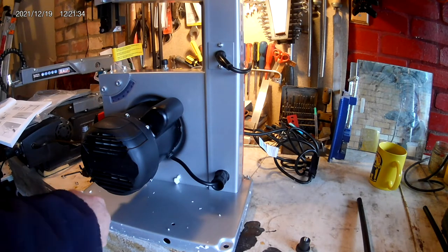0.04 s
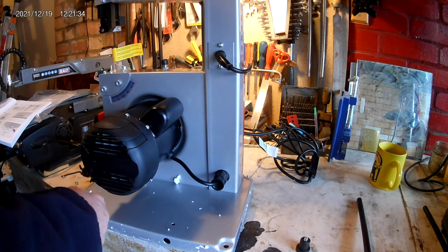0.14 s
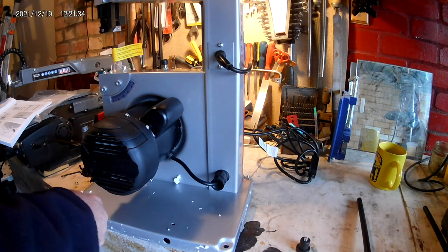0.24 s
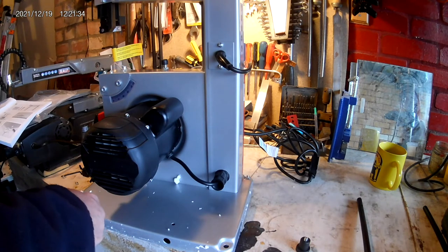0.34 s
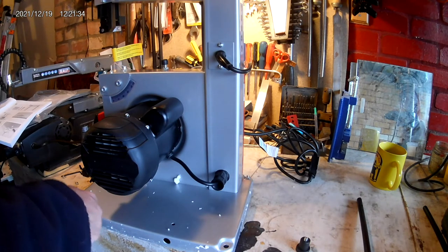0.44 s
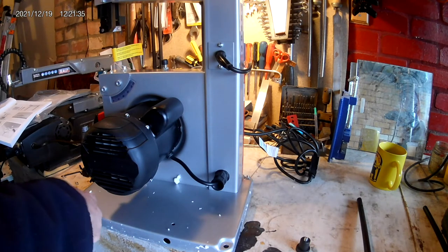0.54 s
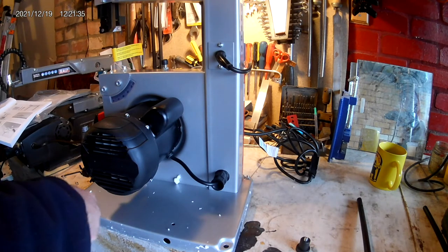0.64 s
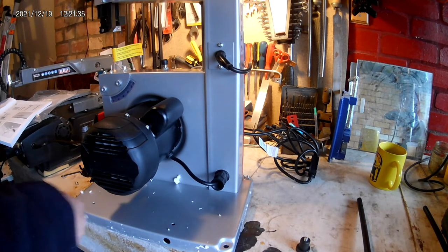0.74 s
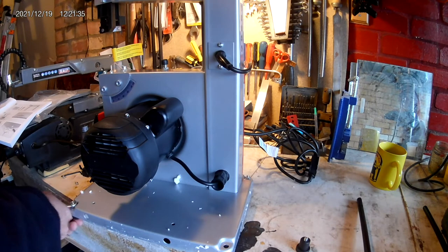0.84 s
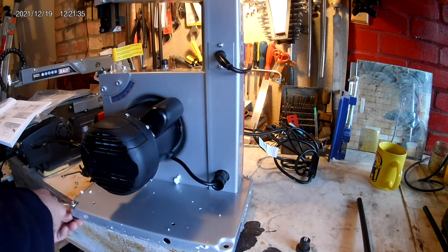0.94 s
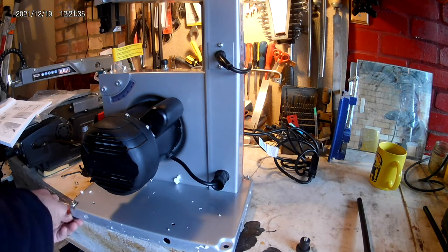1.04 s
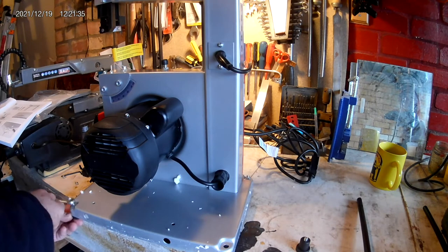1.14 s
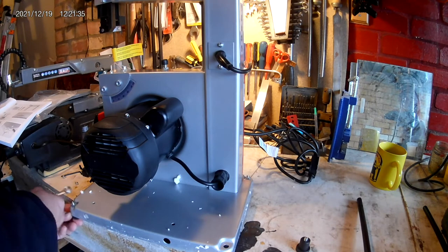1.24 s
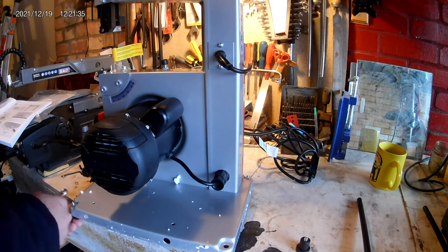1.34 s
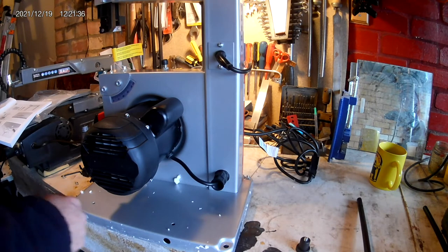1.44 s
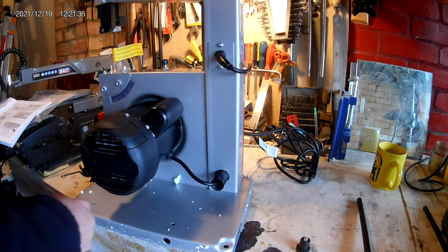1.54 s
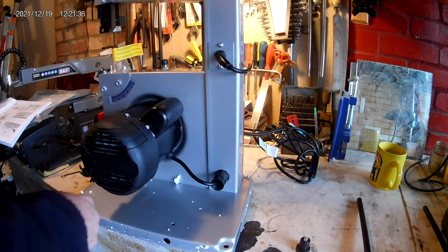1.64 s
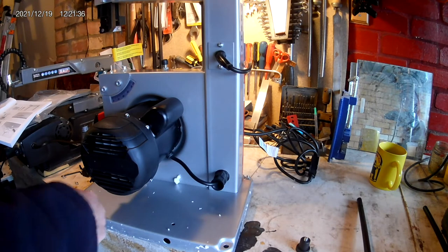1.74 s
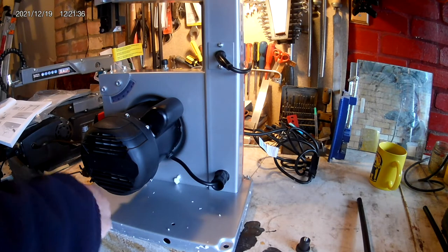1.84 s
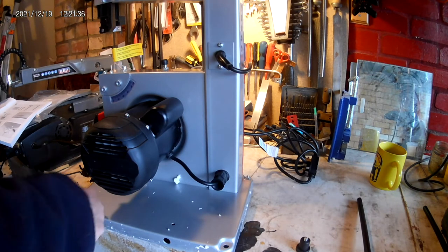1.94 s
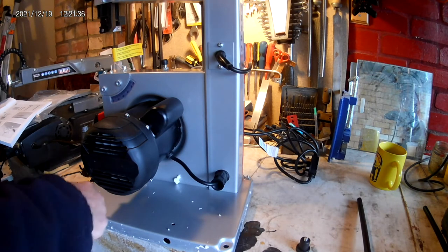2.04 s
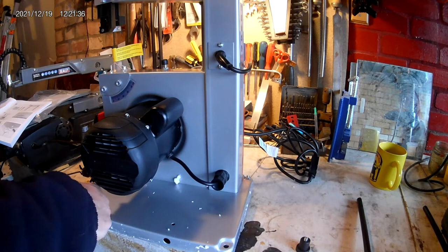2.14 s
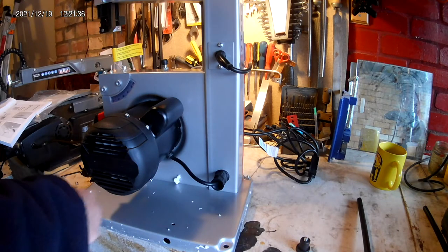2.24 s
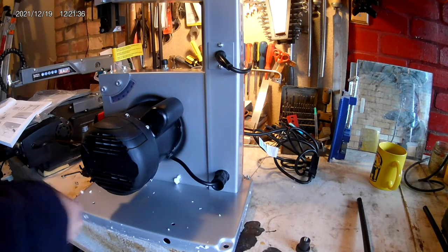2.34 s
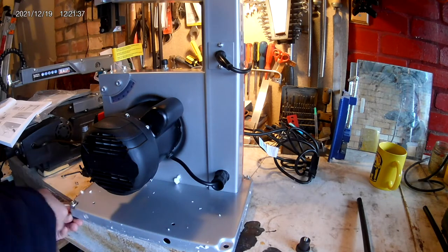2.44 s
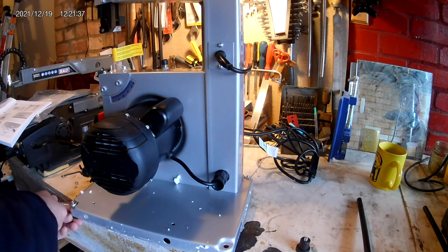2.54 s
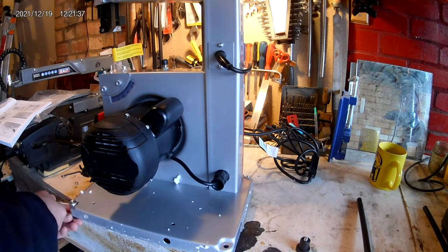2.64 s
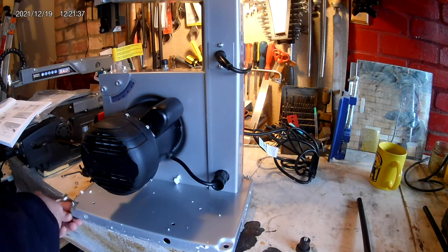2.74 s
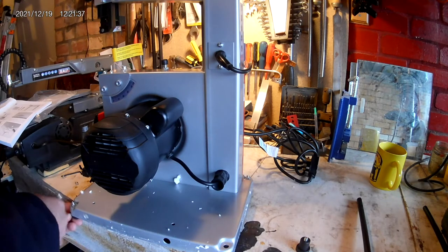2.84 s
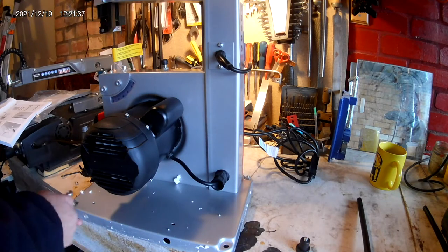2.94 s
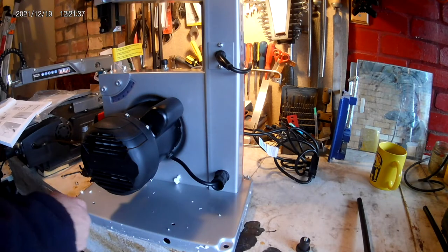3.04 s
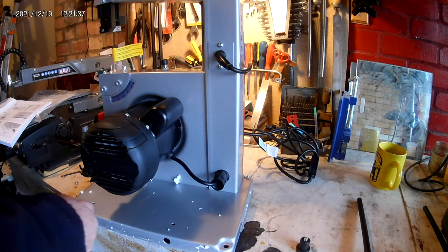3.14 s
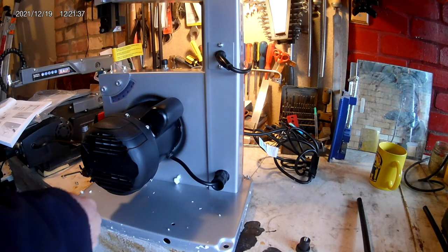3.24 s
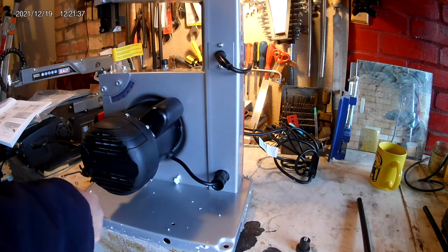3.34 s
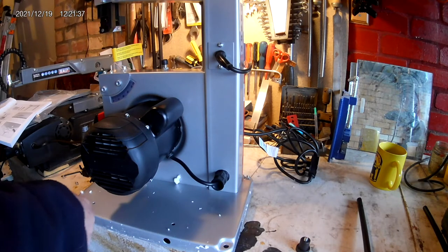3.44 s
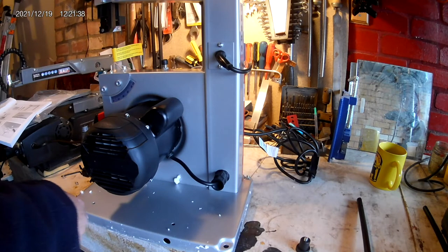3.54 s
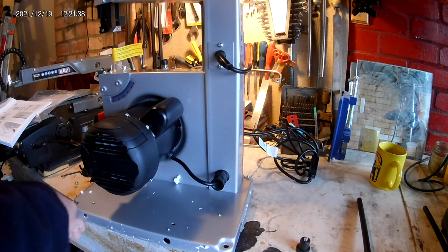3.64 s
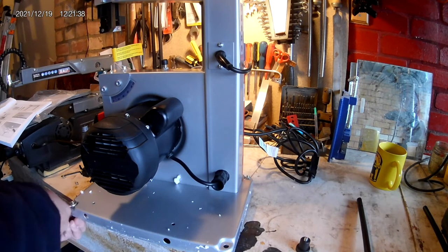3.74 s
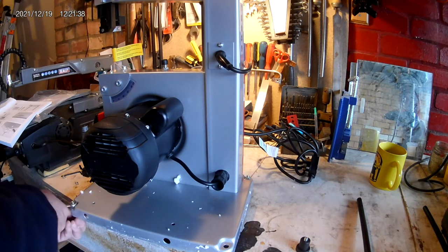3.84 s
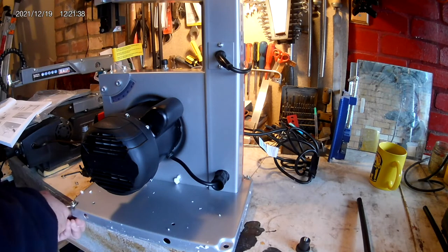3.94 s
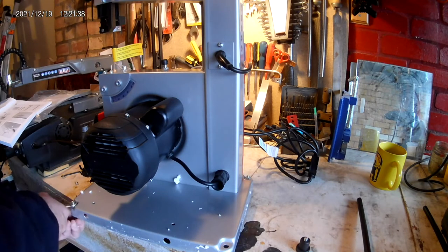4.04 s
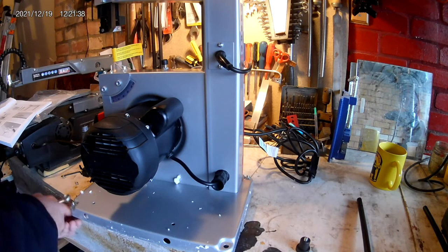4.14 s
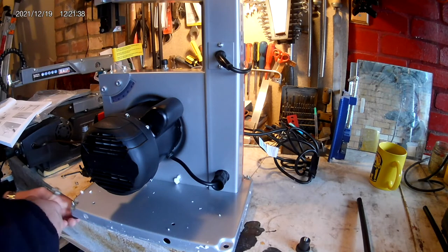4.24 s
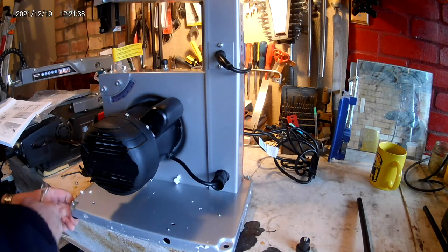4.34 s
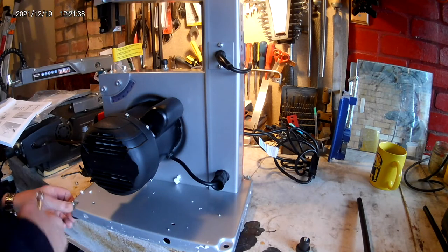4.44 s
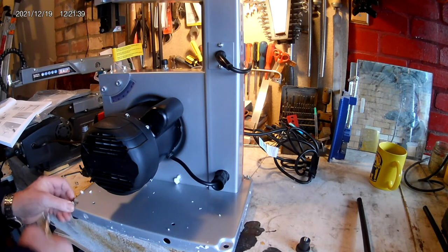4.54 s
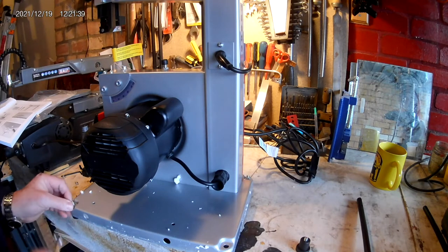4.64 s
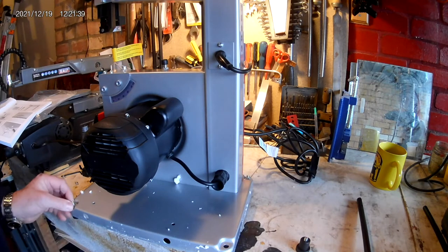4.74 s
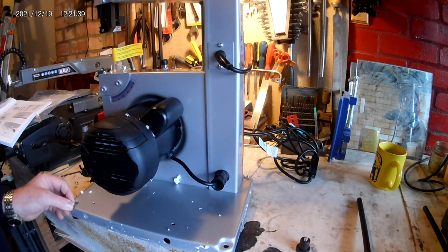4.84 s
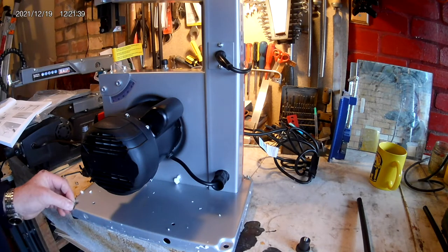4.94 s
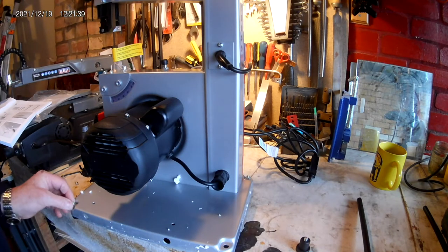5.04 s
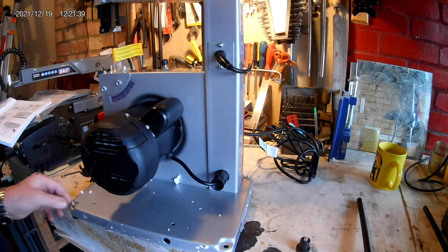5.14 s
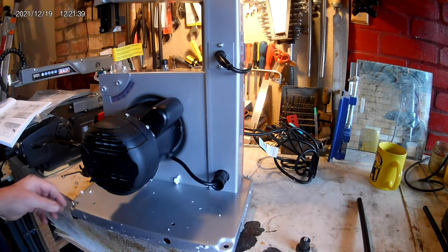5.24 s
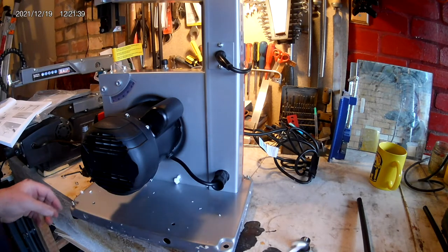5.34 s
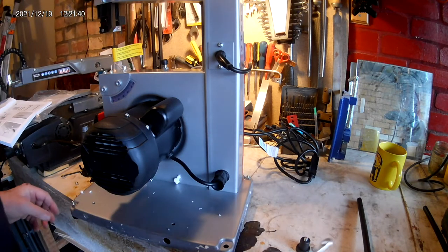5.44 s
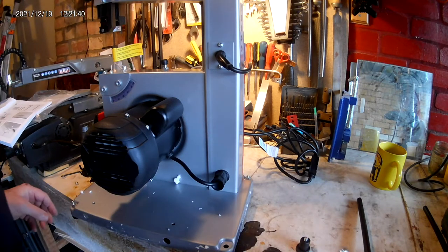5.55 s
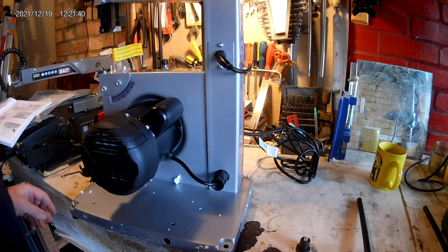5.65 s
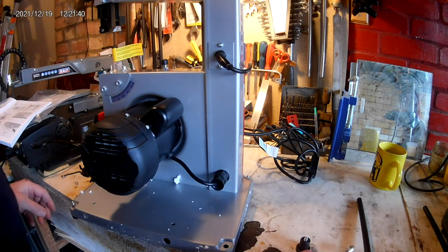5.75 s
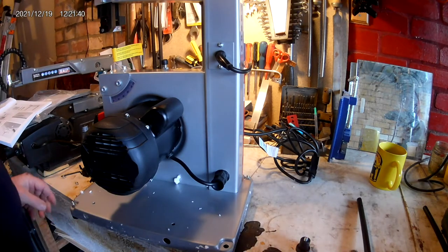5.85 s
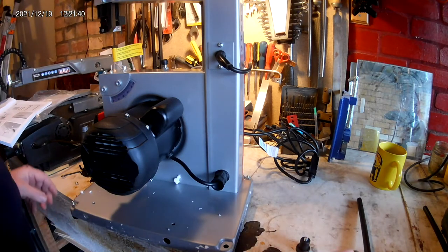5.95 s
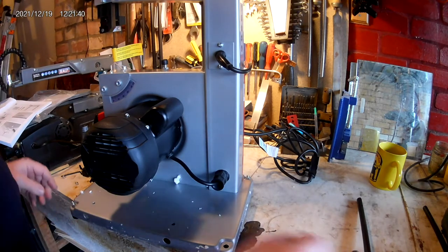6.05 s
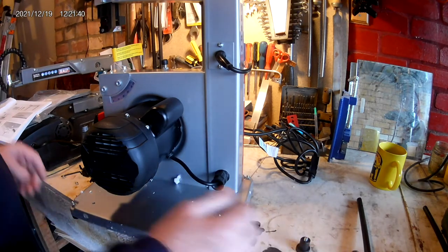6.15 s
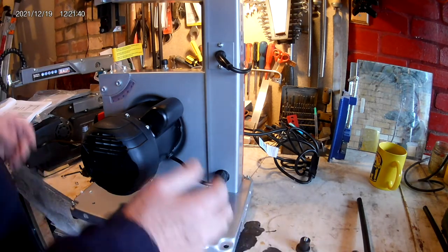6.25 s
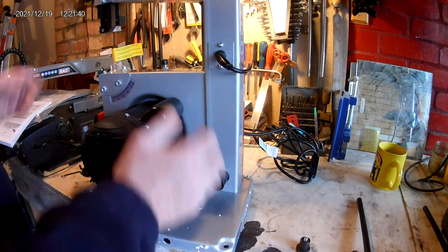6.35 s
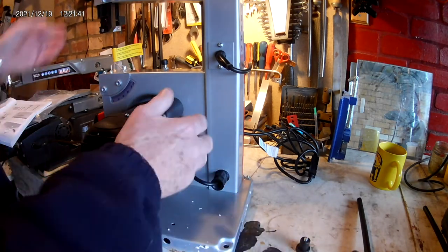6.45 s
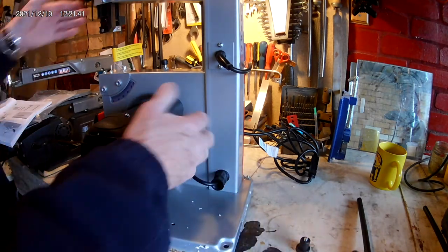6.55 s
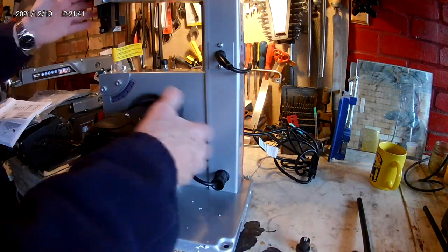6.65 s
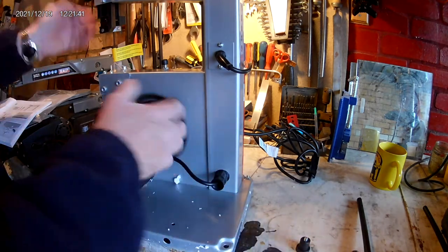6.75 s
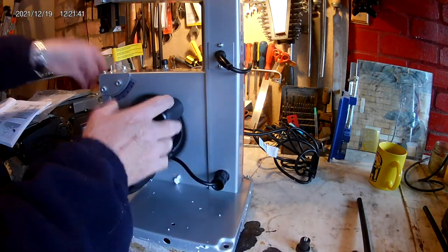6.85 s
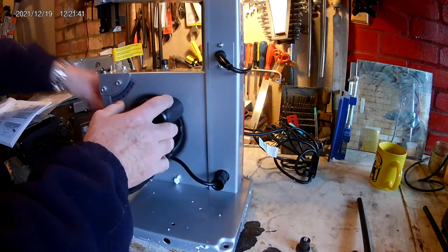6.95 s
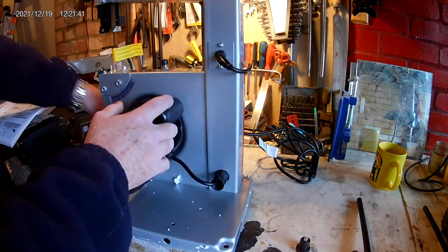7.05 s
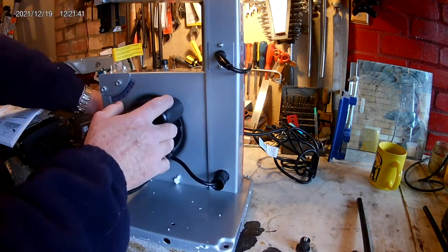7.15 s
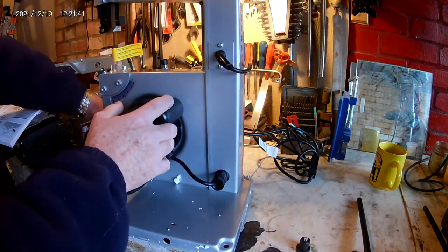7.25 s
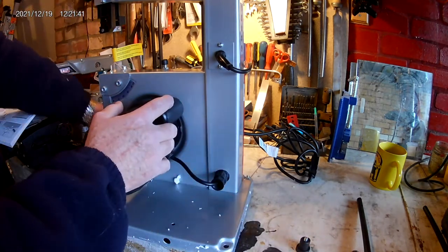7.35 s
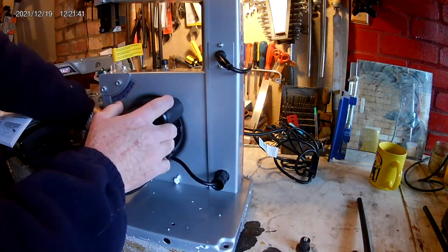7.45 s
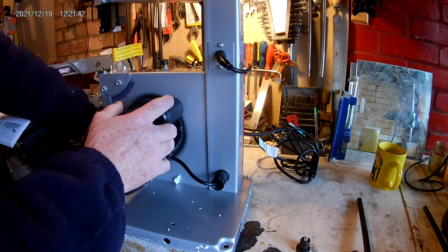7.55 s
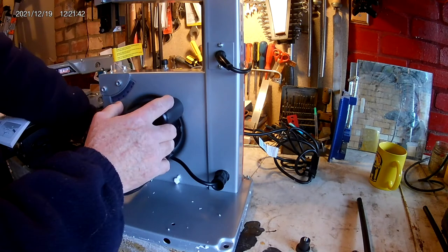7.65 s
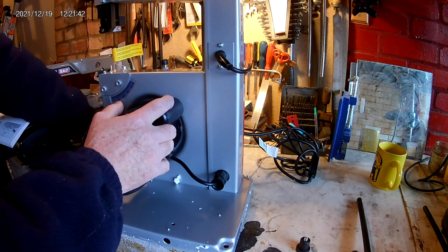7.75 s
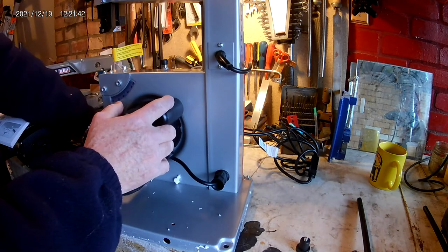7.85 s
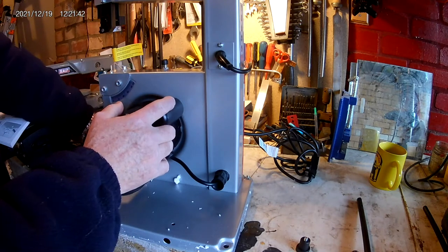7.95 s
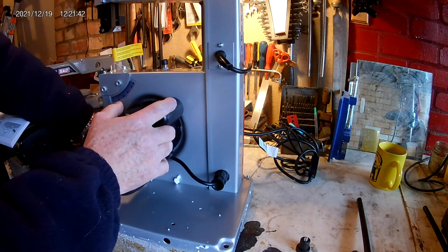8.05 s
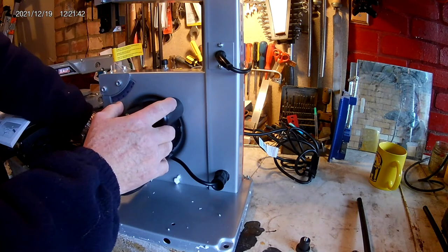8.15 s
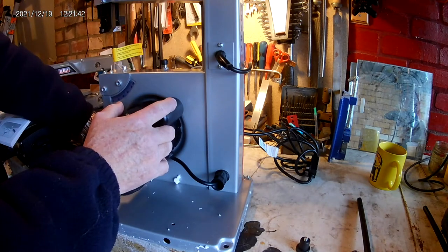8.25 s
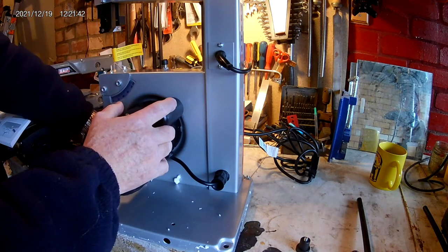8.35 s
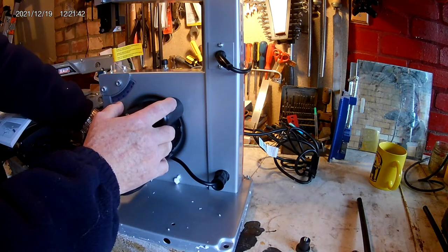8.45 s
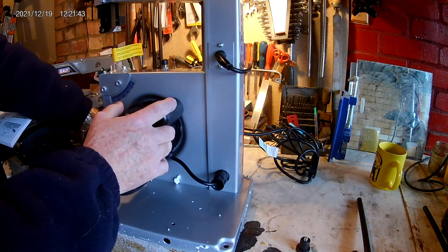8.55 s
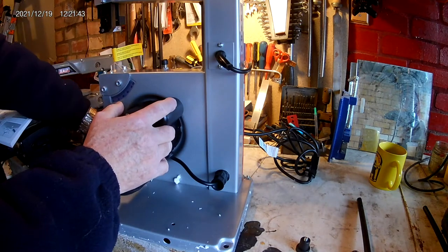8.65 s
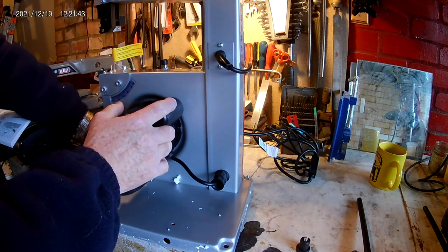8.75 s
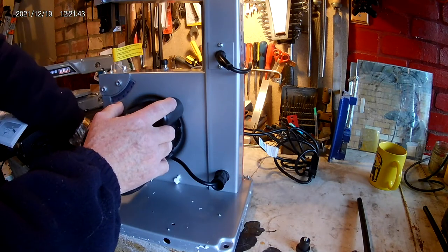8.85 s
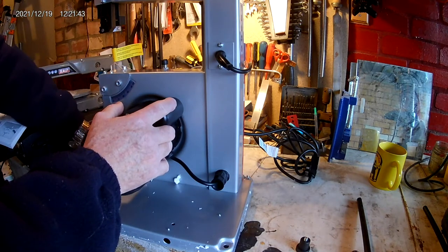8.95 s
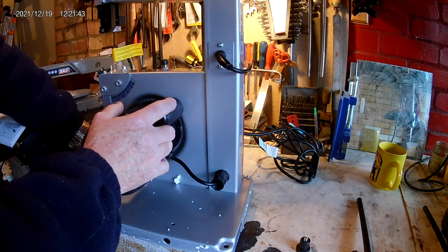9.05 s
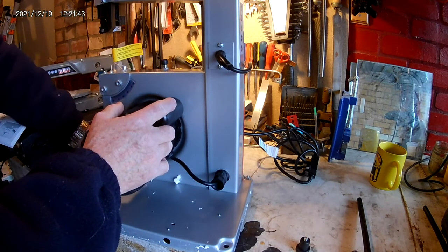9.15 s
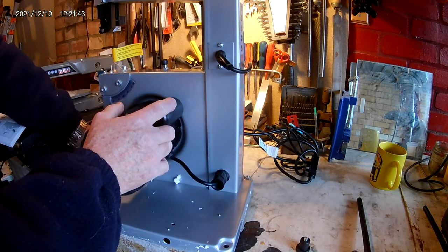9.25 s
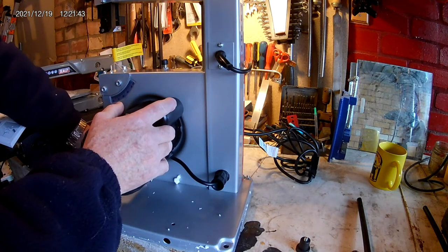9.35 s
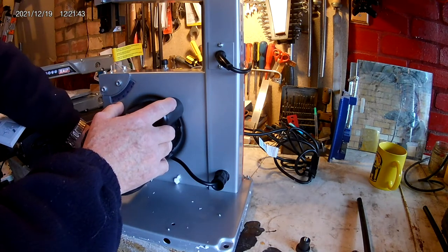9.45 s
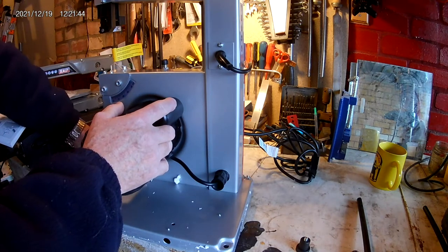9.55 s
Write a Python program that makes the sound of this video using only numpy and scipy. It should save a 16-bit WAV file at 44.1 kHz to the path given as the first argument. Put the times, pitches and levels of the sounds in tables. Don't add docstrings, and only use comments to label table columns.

```python
import sys
import numpy as np
from scipy import signal
from scipy.fft import rfft, irfft, next_fast_len
from scipy.io import wavfile
from scipy.ndimage import uniform_filter1d

SR = 44100
rng = np.random.default_rng(int(sys.argv[2]) if len(sys.argv) > 2 else 0)


def wav_out(sig):
    wavfile.write(sys.argv[1], SR, np.round(np.clip(np.atleast_2d(sig).T, -1, 1) * 32767).astype(np.int16))


def elevation(decibels):
    levels = np.asarray(decibels, float)
    return 10 ** (levels / 20)


N = 423801
RING = np.arange(int(.3 * SR)) / SR

# start_s, peak_db, hardness_db (treble), weight_db (bass), pitch_hz
BLOWS = [(0.204, -27, -21, -16, 820), (0.2505, -23.5, -25, -29.5, 720), (0.355, -43, -35, -14, 1480),
         (0.447, -26, -17.5, -19.5, 780), (1.056, -37, -22, -10.5, 1260), (1.082, -26.5, -21, -23, 867),
         (1.417, -23.5, -20, -19.5, 887), (1.429, -22, -15, -22, 867), (1.589, -42, -24.5, -24, 776),
         (1.753, -30, -23, -18, 667), (2.0648, -27, -20, -17, 1313), (2.435, -33, -52, -16.5, 876),
         (2.602, -41.5, -28, -16, 1130), (3, -27, -13.5, -19.5, 844), (3.0415, -28, -18, -11.5, 765),
         (3.087, -33, -27, -22, 820), (3.136, -33.5, -19, -13, 700), (3.316, -31.5, -28.5, -23, 790),
         (3.812, -45.5, -67, -4, 830), (3.9095, -38, -22, -3.5, 737), (4.031, -39, -26, -16, 1290)]
# start_s, peak_db, hardness_db, weight_db
RATTLES = [(0.209, -28.5, -22, -25.5), (0.299, -35.5, -29, -16), (2.07, -35.5, -23.5, -24.5),
           (2.464, -51.5, -45, 4), (2.597, -55.5, -27, -15), (2.617, -56.5, -25, -15),
           (3.047, -33, -11, -10), (3.166, -43, -28, -3), (3.319, -29.5, -30, -24),
           (3.827, -44.5, -47, -0.5), (4.022, -43.5, -26, -17), (1.747, -36, -23, -14.5),
           (1.454, -34, -21, -5), (0.225, -28.5, -22.5, -16), (0.262, -32.5, -28, -24),
           (0.441, -44, -23, -7), (1.099, -28.5, -21.5, -13), (1.121, -34.5, -24.5, -18),
           (1.444, -29, -22, -15), (1.734, -47, -29, -19), (1.741, -43, -30, -27), (1.764, -32, -27.5, -21),
           (3.014, -30.5, -19, -16), (3.062, -35, -31, -17), (3.15, -32.5, -28.5, -8),
           (3.3, -44.5, -34, -8), (3.311, -33, -72, -24.5), (3.802, -42.5, -41, -5.5),
           (3.901, -48, -16.5, -26), (4.012, -43.5, -32, -31), (4.588, -51.5, -18, 7),
           (5.254, -49, -25, 1.5), (5.274, -56, -17, -8)]
# start_s, peak_db, weight_db, pitch_hz
TOUCHES = [(0.071, -56.5, -5.5, 870), (0.125, -52, 2, 860), (1.888, -65, 17, 700), (2.012, -57, 15, 700),
           (2.395, -54.5, 16, 700), (2.583, -61, 18, 700), (0.58, -52, -3.5, 880), (0.646, -53, 2, 740),
           (0.973, -52.5, -3, 790), (1.296, -54, 4, 540), (1.666, -54.5, -23, 850),
           (1.868, -46.5, -4.5, 794), (1.955, -55, -23, 820), (1.971, -51.5, -1, 830), (2.422, -68, 9, 744),
           (2.54, -52.5, -7, 800), (2.666, -61, -7, 740), (3.191, -68, -19, 690), (3.495, -58, -16, 830),
           (3.544, -59, -4, 880), (4.108, -49, -16, 810), (4.328, -57, -7, 865), (4.441, -60, -19, 1260),
           (4.469, -63, -18, 1250), (5.159, -62, -7.5, 1190)]
# start_s, peak_db, hardness_db, weight_db, pitch_hz
BOUNCES = [(5.749, -25.5, -21.5, -30.5, 1780), (5.782, -25, -28.5, -12.5, 1030),
           (5.805, -31, -23, -7.5, 946), (5.754, -37, -18, -19, 1090), (5.787, -28, -25, -25, 960),
           (5.821, -23, -26, -10.5, 920), (5.8255, -20.5, -16.5, -8, 938), (5.832, -27, -28.5, -4.5, 796),
           (5.875, -23, -18.5, -14, 920), (5.852, -29.5, -27, -20, 910), (5.84, -30.5, -53, -10, 930),
           (5.87, -20.5, -17.5, -17, 998), (5.888, -29.5, -27, -29, 1470), (5.904, -27, -41, -14, 930),
           (5.911, -41.5, -12, -20, 1160), (5.924, -39, -13, -9, 1010)]
# start_s, level_db, pitch_hz
GLINTS = [(0.204, -38.5, 2437), (0.2038, -39.5, 3400), (0.2048, -49, 4470.0), (0.251, -39, 2193),
          (0.251, -52.5, 3730), (0.253, -68, 5330), (0.448, -44.0, 2200), (0.448, -59.5, 3720),
          (0.449, -62.5, 4550.0), (1.084, -57, 3330.0), (1.084, -71, 4930), (1.096, -52, 2486),
          (1.095, -63, 5470), (1.121, -58, 3470.0), (1.122, -60, 4790), (1.417, -37.5, 2384),
          (1.416, -48.5, 3750), (1.417, -47.5, 5240), (1.43, -44, 2197), (1.43, -47.5, 3960),
          (1.43, -62, 5330), (1.444, -46, 2405), (1.444, -61, 3320.0), (1.444, -65, 4910),
          (1.752, -49.5, 2476), (1.75, -50.5, 3460), (1.752, -55, 5360.0), (2.0662, -48, 2380),
          (2.0655, -53, 3580), (2.0655, -50, 5030), (3.001, -42, 2505), (3.002, -49, 4400),
          (3.001, -49.5, 6700), (3.041, -50, 2426), (3.042, -51, 4480), (3.045, -52, 5360.0),
          (3.137, -54.5, 3530), (3.136, -61, 4690), (3.319, -47, 2205), (3.32, -58, 4440.0),
          (3.908, -62, 2380), (4.029, -60.5, 2454), (5.752, -58, 2600), (5.751, -60, 3770),
          (5.823, -49, 2870), (5.823, -44.5, 3600), (5.823, -53.5, 5020), (5.869, -58.5, 2720.0),
          (5.871, -51.5, 3450), (5.872, -52.5, 4060), (5.923, -67, 2700), (5.923, -58, 3670),
          (7.633, -57.0, 2930), (7.634, -57, 5440), (8.346, -72, 3860), (8.345, -67, 5260)]
# start_s, peak_db, hardness_db, weight_db, pitch_hz
TAPS = [(6.806, -54.5, -24, 14, 543), (6.917, -35.5, -50, -7, 1340), (6.926, -40, -50, -11.5, 1360),
        (7.486, -48.5, 1, 5.5, 825), (7.512, -55, -4, -24, 520), (7.632, -30.5, -10.5, -40, 970),
        (7.648, -26.5, -15, -27.5, 708), (7.718, -35, -46, -13.5, 504), (7.769, -43, -45, -29, 760),
        (7.83, -47, -10, -17, 756), (7.939, -54, -5, -2, 1140), (8.14, -46.5, -34, -14, 810),
        (8.245, -41.5, -41, -8, 890), (8.283, -52, -5, -10, 867), (8.308, -35, -56, -22, 483),
        (8.344, -38, -5, -11, 1080),
        (8.883, -67, -22, -16, 930),
    (8.967, -50, -22, -37, 890),
    (8.999, -41, -23, -14, 890),
    (9.041, -41, -10, -32, 1340),
    (9.103, -44, -19, -23, 1080),
    (9.136, -40, -16, -9, 1050),
    (9.278, -47.5, -15, -29, 1080),
    (9.398, -48, -23, -9, 509),
    (9.456, -51.5, -29, -5, 1040),
    (9.584, -57, -15, -8, 1470),
]
# start_s, hold_s, level_db, treble_db
STROKES = [(7.49, 0.013, -66, 2.5), (7.715, 0.088, -58.5, 1), (7.841, 0.16, -53.5, 1),
           (8.076, 0.1, -56, -4.5), (8.277, 0.036, -57, -4), (8.327, 0.055, -51, -3),
           (8.862, .05, -67.5, 4), (8.993, 0.23, -54, 2), (9.213, 0.062, -55.5, -2.5),
           (9.334, 0.13, -59.5, -1.5), (9.6, 0.056, -55.5, 2)]
# start_s, peak_db, pitch_hz, t60_s
CHINKS = [(5.85, -72.5, 6450, 0.28), (6.917, -50.5, 1380, 0.12), (6.917, -64, 2430, 0.047),
          (7.634, -74, 9800, 0.054), (8.067, -75, 5600, .08), (8.07, -86, 11550, .1),
          (7.5156, -63.5, 6960, 0.057), (7.63, -71, 6860, 0.082), (7.72, -95, 7040, 0.14),
          (7.8306, -84, 6960, 0.074), (8.0641, -87, 6950, 0.11), (8.1648, -77, 6970, 0.071),
          (8.282, -73, 6920, 0.08), (9.1128, -70, 6280, 0.085), (9.4175, -85, 6260, 0.063),
          (0.252, -64, 4260, .12), (0.448, -60, 6900, 0.041), (3.045, -64, 7200, .1),
          (3.003, -61, 3450, .05), (3.006, -57, 3900, 0.079), (5.9, -77, 6450, .2),
          (7.72, -70, 3900, 0.083)]
# start_s, hold_s, level_db
SLEEVE = [
    (6.714, 0.0093, -81.5),
    (6.802, 0.0087, -81.5),
]
# start_s, hold_s, level_db
ROCK = [
    (8.168, 0.17, -53.5),
]
# pitch_hz, level_db, t60_s
PLATE = [(154, -4, 0.69), (364.8, -5, 0.47), (396, -11, 0.16), (616.5, -10, 0.27), (672.5, 1.5, 0.1),
         (744, -11, 0.13), (786.6, 0, 0.11), (858.7, -6.5, 0.14), (878, -3, 0.37), (1050, -6.5, 0.057),
         (1311, 3, 0.069), (1371, -4, 0.18), (1470, -14.5, 0.62), (1730, -18.5, 0.35), (1850, -22, 0.74),
         (1950, -13, 0.94), (2230, -1, 0.058), (2370, -13.5, 0.17), (3452, -5.5, 0.055),
         (3670, -17.5, 0.11), (5290, -32, 0.13), (7360, -28, 0.07), (6830, -25.5, 0.075), (9400, -23, 0.17),
         (10640, -20, 0.21)]
BENCH = [(353, 0, 0.3), (563, -4.5, 0.14), (922, 2.5, 0.053), (1220, -5, 0.24), (1350, 6.5, 0.12),
         (1486, -1, 0.23), (2090, -2, 0.12), (2820, -13, 0.31), (3220, -32, 0.24), (3840, -9, 0.3),
         (5270, -31, 0.25), (5600, -30, 0.47)]
HOUSING = [(375, 5, 0.33), (471, -3.5, 0.25), (627, -25, 0.07), (780, -1, 0.098), (867, 16.5, 0.022),
           (1050, -2, 0.041), (1340, -3.5, 0.13), (1630, -11, 0.22), (2178, -13, 0.043), (2440, -15, 0.074),
           (3400, -28, 0.092), (3905, -18.5, 0.1)]
# pitch_hz, level_db (per Hz)
PLATE_COLOUR = [(47, -39.5), (80, -23.5), (340, -15), (515, -19.5), (852, -8), (971, -14.5), (1410, -8),
                (2440, -14.5), (2780, -28.5), (5600, -31), (7000, -56), (9680, -53), (15000, -79)]
BENCH_COLOUR = [(35, -52), (60, -30), (234, -8.5), (295, -14.5), (399, -6.5), (539, -6.5), (960, -5),
                (2110, -7.5), (2950, -28.5), (3750, -19), (7330, -63.5), (15500, -55)]
HOUSING_COLOUR = [(65, -35), (130, -1), (205, -10), (247, -5), (318, -20.5), (380, 1.5), (604, 0),
                  (861, 0.5), (986, -21.5), (1070, 2), (1800, -9.5), (2620, -24.5), (3870, -31),
                  (6200, -44.5), (8060, -81), (13600, -120)]
# pitch_hz, level_db (per Hz)
ROOM = [(14, -12.5), (25, -2.5), (92, -0.5), (175, -4), (300, -8.5), (533, -11.5), (1190, -18),
        (2140, -25.5), (3500, -29.5), (5500, -35.5), (7600, -35.5), (8700, -43), (13000, -45.5),
        (15400, -42)]


def spanner(plate):
    rattles = [(*row, 714) for row in RATTLES]
    touches = [(s, db, -37, weight_db, hz) for s, db, weight_db, hz in TOUCHES]  # hardness, dB
    contacts = with_edge(BLOWS + rattles + touches, edge_db=-2.0, follows=0.58)
    blur = dict(low_db=2.5, high_db=2.5, t60_low=.15, t60_high=.1)
    return knocks(contacts, plate, scatter_db=4, usual_db=[-23, -19, -12], chatter_ms=4.3, crack_db=7.0,
                  damping=11, contact_s=0.003, blur=blur, thin_db=-6, thump_db=-2.0)


def fitting(bench):
    contacts = with_edge(BOUNCES, edge_db=-10, follows=0.31)
    blur = dict(low_db=3.0, high_db=2.5, t60_low=.11, t60_high=0.082)
    return knocks(contacts, bench, scatter_db=1.0, usual_db=[-23, -19, -14], chatter_ms=4.3, crack_db=4.5,
                  damping=3.2, contact_s=0.0019, blur=blur, thin_db=-8, thump_db=-3)


def hands(housing):
    contacts = with_edge(TAPS, edge_db=-6.0, follows=0.42)
    blur = dict(low_db=5.0, high_db=5, t60_low=.13, t60_high=0.061)
    return knocks(contacts, housing, scatter_db=6.0, usual_db=[-27, -18, -16], chatter_ms=5.5, crack_db=7.0,
                  damping=5.3, contact_s=0.0022, blur=blur, thin_db=-4.5, thump_db=-9.5)


def knocks(events, thing, scatter_db, usual_db, chatter_ms, crack_db, damping, contact_s, blur, thin_db,
           thump_db):
    hz, gain, rings, crowd = thing
    out = np.zeros(N)
    spots = rng.standard_normal((len(events), 2, len(hz)))
    slips = rng.standard_normal((len(events), 2, 1024))
    dust = rng.standard_normal((len(events), len(RING)))
    fade = np.exp(-damping * RING) * (1 + elevation(crack_db) * np.exp(-RING / 0.0083))
    for (s, db, *colour, favoured_hz), spot, slip, noise in zip(events, spots, slips, dust):
        favour_db = 8.2 * np.exp(-(np.log(hz / favoured_hz) / 0.12) ** 2)
        usual = gain * tilt(hz, *(np.array(colour) - usual_db)) * elevation(favour_db)
        spot_gain = elevation(scatter_db * spot[0] + thin_db * upper(hz) - 3.5) * np.sign(spot[1])
        share = (usual * spot_gain).astype(np.float32)
        loose = share[crowd] @ rings[crowd]
        strong = share @ rings - loose
        ring = np.interp(RING * (1 + .012 * slip[1, 0]), RING, strong)
        ring += np.interp(RING * (1 + .03 * slip[0, 0]), RING, loose)
        ring += haze(hz[crowd], usual[crowd], noise, **blur)
        soft = elevation(0.64 * max(-35 - db, 0))
        rise = np.sin(np.pi / 2 * np.minimum(RING / (contact_s * soft), 1)) ** 2
        chatter_fade = np.exp(-RING[:1024] * 1000 / (chatter_ms * soft))
        force = (slip[0] > 2.1) * slip[1] * chatter_fade * .4
        force[0] = 1
        sound = signal.fftconvolve(ring * rise * fade, force)
        sound /= np.abs(sound).max()
        turn = RING[:256] * np.clip(favoured_hz, 750, 1400)
        push = np.sin(2 * np.pi * turn) * turn * np.exp(-turn / .55) * 4
        sound[:256] += elevation(thump_db) / soft * push
        add(out, sound * elevation(db), s)
    return out


def with_edge(events, edge_db, follows):
    return [(s, db, hard_db, weight_db, edge_db + follows * hard_db, hz)
            for s, db, hard_db, weight_db, hz in sorted(events)]


def tilt(hz, treble_db, bass_db, edge_db):
    corners = np.log([300, 550, 1300, 1900, 3300])
    return elevation(np.interp(np.log(hz), corners, [bass_db, 0, 0, edge_db, treble_db]))


def body(modes, colour, dense_db, t60_low, t60_high, count=200):
    strong_hz, strong_db, strong_t60 = np.transpose(modes)
    place = (np.arange(count) + rng.random(count)) / count
    crowd_hz = colour[0][0] + (colour[-1][0] - colour[0][0]) * place ** 2.4
    crowd_db = colour_db(colour, crowd_hz) + 14 * np.log10(place) + dense_db
    crowd_t60 = np.interp(np.log(crowd_hz), np.log([300, 6000]), [t60_low, t60_high])
    hz, t60 = np.r_[strong_hz, crowd_hz], np.r_[strong_t60, crowd_t60]
    pole = (2j * np.pi * hz - np.log(1000) / t60)[:, None].astype(np.complex64)
    rings = np.exp(pole * RING.astype(np.float32)).imag.copy()
    return hz, elevation(np.r_[strong_db, crowd_db]), rings, slice(-count, None)


def haze(hz, gain, noise, low_db, high_db, t60_low, t60_high):
    grid = np.fft.rfftfreq(len(RING), 1 / SR)
    density = np.sqrt(SR / 4 / np.gradient(hz))
    spec = rfft(noise) * np.interp(grid, hz, gain * density, right=0)
    low, high = irfft(spec * [1 - upper(grid), upper(grid)], len(RING))
    return elevation(low_db - 60 * RING / t60_low) * low + elevation(high_db - 60 * RING / t60_high) * high


def upper(hz):
    return 1 / (1 + (1800 / np.maximum(hz, 1)) ** 4)


def colour_db(table, hz):
    table_hz, table_db = np.transpose(table)
    return np.interp(np.log(hz), np.log(table_hz), table_db)


def add(out, sound, s):
    at = int(s * SR)
    out[at:at + len(sound)] += sound[:N - at]


def glints(rise_s=0.0018, t60_s=.05, lift_db=2.5, rough=0.59):
    out, t = np.zeros(N), RING[:4096]
    wobble = uniform_filter1d(rng.standard_normal((len(GLINTS), 2, len(t))), size=64, axis=2) * 8
    for (s, db, hz), (a, b) in zip(GLINTS, wobble):
        tone = (np.exp(2j * np.pi * hz * t) * (1 + rough * (a + 1j * b))).imag
        shape = elevation(db + lift_db - 60 * t / t60_s) * (1 - np.exp(-t / rise_s))
        add(out, shape * tone, s)
    return out


def rub(thing, grains_per_s, spread_db):
    hz, gain, rings, crowd = thing
    grains = (rng.random(N) < grains_per_s / SR * elevation(4 * walk(22))) * rng.standard_normal(N)
    grains = grains * elevation(spread_db * np.minimum(rng.exponential(size=N), 2.5))
    share = gain * np.sign(rng.standard_normal(len(hz)))
    held = np.exp(-75 * RING)
    strength = np.linalg.norm(share @ rings * held)
    bright = hz > 1500
    strokes = np.array(STROKES)
    treble_db = strokes[np.searchsorted(strokes[1:, 0], np.arange(N) / SR + .03), 3]
    db = gesture_db(strokes[:, :3], attack_db_s=359, sag_db_s=26, release_db_s=346)
    out = np.zeros(N)
    for part, lift_db in ((~bright, 0), (bright, treble_db)):
        ring = (share * part @ rings) * held / strength
        out += signal.fftconvolve(grains * elevation(db + lift_db), ring)[:N]
    skin = haze(hz[crowd], gain[crowd], rng.standard_normal(len(RING)),
                low_db=-10.5, high_db=9, t60_low=0.096, t60_high=0.016)
    out += signal.fftconvolve(grains * elevation(db + treble_db), skin / strength)[:N]
    return out / np.sqrt(np.mean(grains ** 2))


def gesture_db(events, attack_db_s, sag_db_s, release_db_s):
    start, hold, db = np.transpose(events)[:, :, None]
    ticks = np.arange(0, N / SR, .001)
    late = ticks - start
    shape = db + attack_db_s * np.minimum(late, 0)
    shape = shape - sag_db_s * np.clip(late, 0, hold) - release_db_s * np.maximum(late - hold, 0)
    return np.interp(np.arange(N) / SR, ticks, np.maximum(shape.max(axis=0), -200))


def walk(rate):
    k = int(SR / rate)
    steps = np.repeat(rng.standard_normal(N // k + 1), k)
    return 1.3 * uniform_filter1d(uniform_filter1d(steps, k), k)[:N]


def chinks(rise_s=0.0027):
    out = np.zeros(N)
    for s, db, hz, t60 in CHINKS:
        shape = (1 - np.exp(-RING / rise_s)) * np.exp(-np.log(1000) * RING / np.clip(t60, .03, .3))
        add(out, elevation(db + 4.5) * shape * np.sin(2 * np.pi * hz * RING), s)
    return out


def sleeve():
    grains = (rng.random(N) < .04) * rng.standard_normal(N) * elevation(4.1 * walk(57))
    cloth = signal.sosfilt(signal.butter(2, [3300, 5900], "band", fs=SR, output="sos"), grains)
    db = gesture_db(SLEEVE, attack_db_s=257, sag_db_s=25, release_db_s=296)
    return cloth / cloth.std() * elevation(db)


def rock(top_hz=90):
    band = signal.butter(2, [28, top_hz], "band", fs=SR, output="sos")
    shudder = signal.sosfilt(band, rng.standard_normal(N))
    db = gesture_db(ROCK, attack_db_s=402, sag_db_s=120, release_db_s=606)
    return shudder / shudder.std() * elevation(db)


def walls(x, wet_db, t60, dull_hz):
    fade = np.exp(-np.log(1000) * RING / t60) * np.clip(RING / 0.0072, 0, 1)
    tail = rng.standard_normal(len(RING)) * fade
    tail = signal.sosfilt(signal.butter(1, dull_hz, fs=SR, output="sos"), tail)
    return x + elevation(wet_db) * signal.fftconvolve(x, tail / np.linalg.norm(tail))[:N]


def room_tone(level_db=-68):
    size = next_fast_len(N, True)
    hz = np.maximum(np.fft.rfftfreq(size, 1 / SR), 1)
    noise = rfft(rng.standard_normal(size)) * elevation(colour_db(ROOM, hz))
    out, swell = 0, walk(2.2)
    for step in np.arange(8, 29):
        band = np.clip(1 - np.abs(2 * np.log2(hz) - step), 0, 1)
        out = out + irfft(noise * band, size)[:N] * elevation(0.5 * swell + 0.39 * walk(24))
    return out / out.std() * elevation(level_db)


def scene():
    plate = body(PLATE, PLATE_COLOUR, dense_db=5.5, t60_low=0.2, t60_high=0.049)
    bench = body(BENCH, BENCH_COLOUR, dense_db=18.5, t60_low=0.1, t60_high=0.062)
    housing = body(HOUSING, HOUSING_COLOUR, dense_db=4.5, t60_low=0.22, t60_high=0.027)
    work = spanner(plate) + fitting(bench) + hands(housing)
    work += rub(housing, grains_per_s=1500, spread_db=4.5)
    work += glints() + chinks() + sleeve()
    work = signal.sosfilt(signal.butter(2, 75, "high", fs=SR, output="sos"), work)
    return (walls(work, wet_db=-9.5, t60=0.2, dull_hz=5220) + rock() + room_tone())[None]


def band_limit(x):
    return signal.sosfilt(signal.butter(12, 15600, fs=SR, output="sos"), x)


def record(dry):
    heard = signal.sosfilt(signal.butter(2, 22, "high", fs=SR, output="sos"), dry)
    return band_limit(heard)


dry = scene()
out = record(dry)
wav_out(out)
```